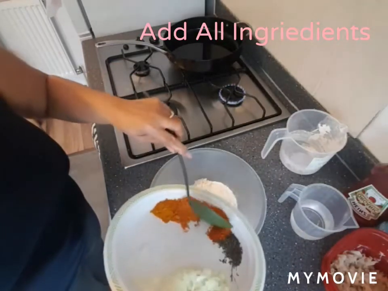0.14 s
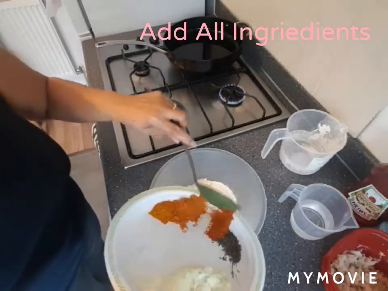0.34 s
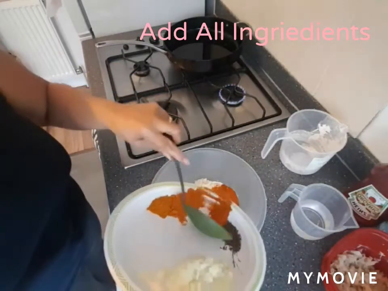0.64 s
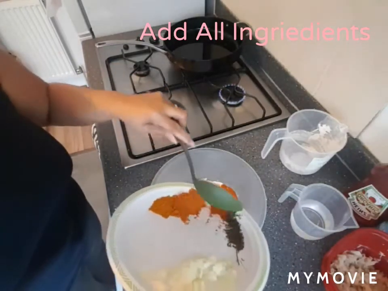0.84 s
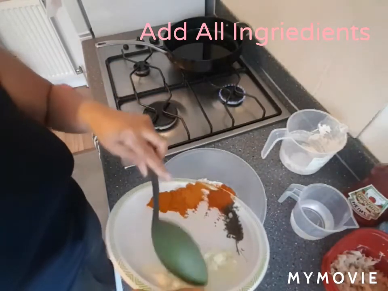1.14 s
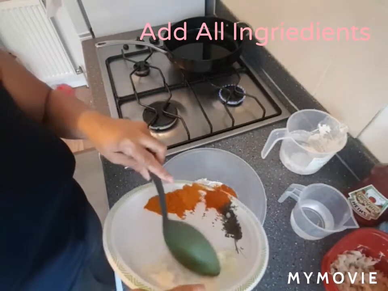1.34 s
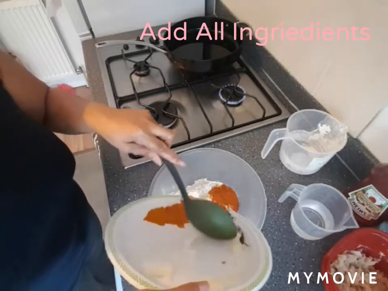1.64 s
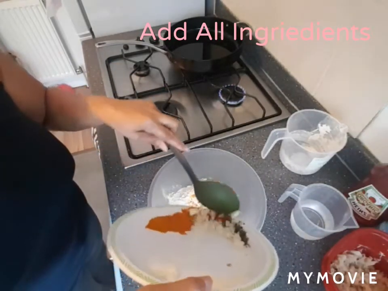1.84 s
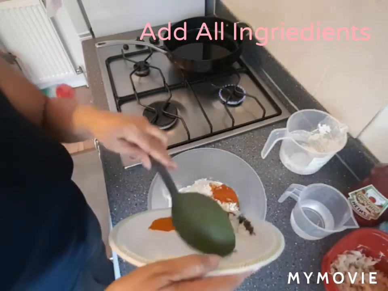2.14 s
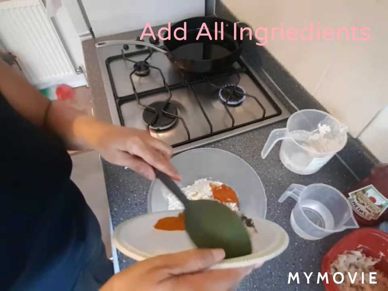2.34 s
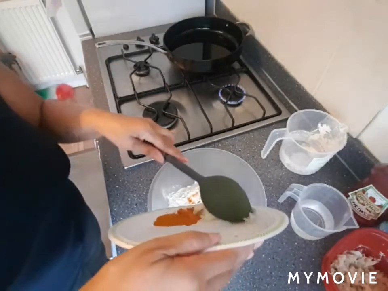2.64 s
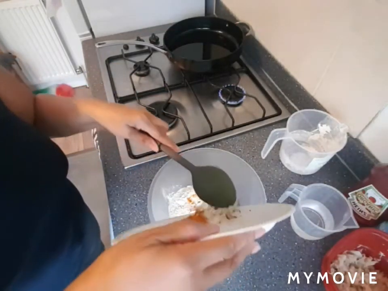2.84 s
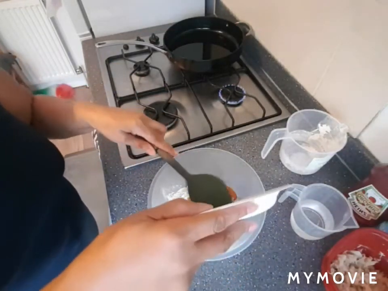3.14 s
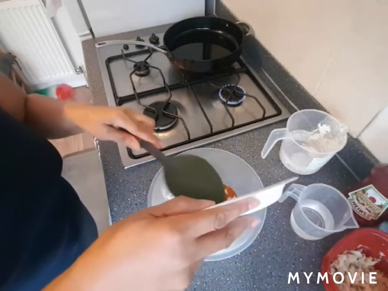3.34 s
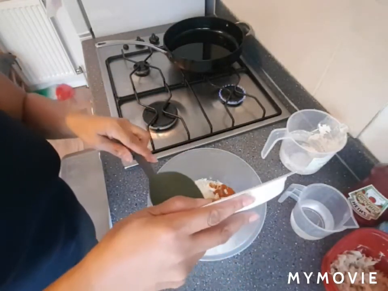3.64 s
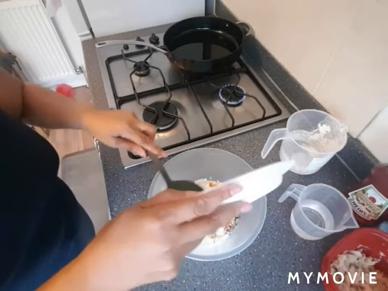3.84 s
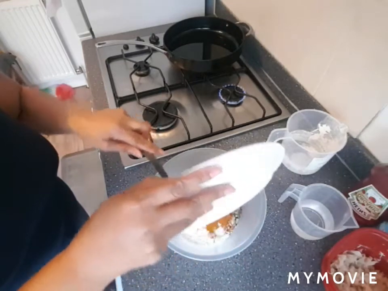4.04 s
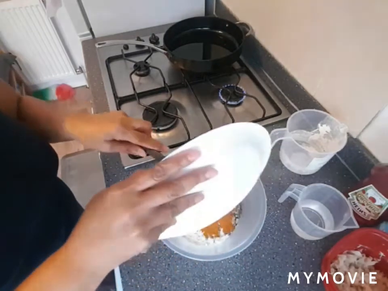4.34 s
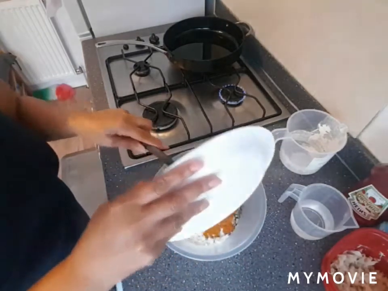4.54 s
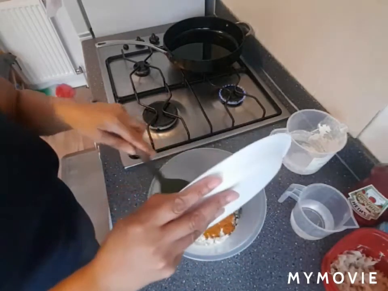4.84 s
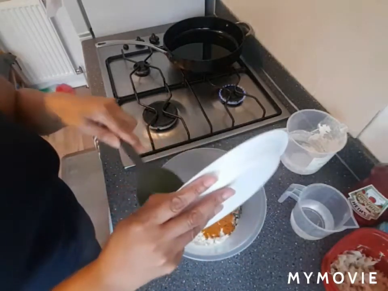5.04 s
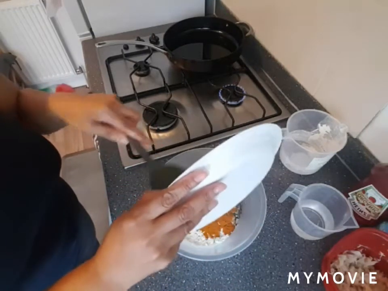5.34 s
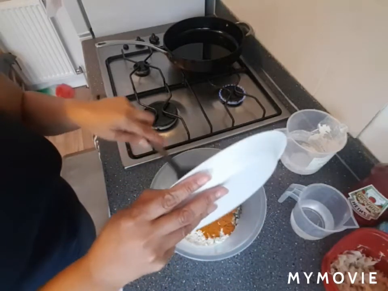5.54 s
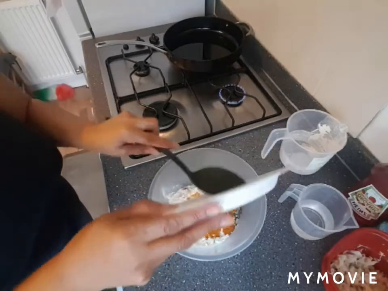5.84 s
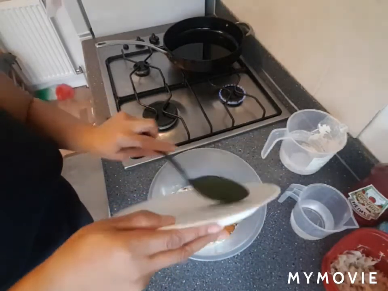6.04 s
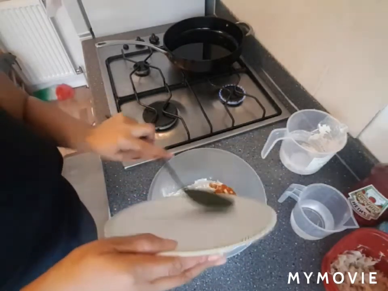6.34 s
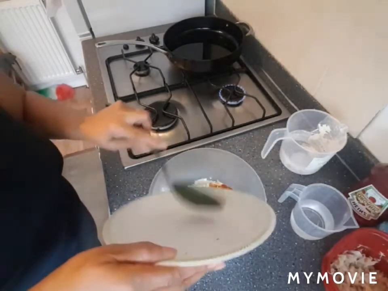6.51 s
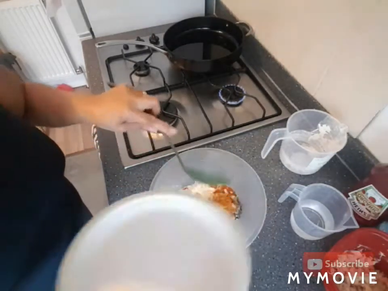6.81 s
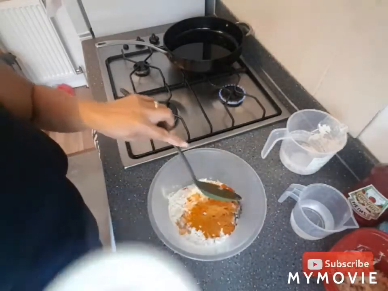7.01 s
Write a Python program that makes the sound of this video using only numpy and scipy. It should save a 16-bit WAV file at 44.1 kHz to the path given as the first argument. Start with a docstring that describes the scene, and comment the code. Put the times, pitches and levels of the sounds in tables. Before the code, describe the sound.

A plastic spatula works over a plate close to the microphone in a small kitchen with a short echo. From the start it pushes spices into a plastic mixing bowl with quick taps and short, powdery rasps, knocking the bowl at about 0.7 seconds with a firmer scrape. At 1.6 seconds the blade skips in a brief rattle. Softer, uneven scrapes and rim clicks continue, and around 3 seconds come a few light, dry ticks like dropping crumbs. From about 4.4 seconds, dull thumps jostle the bowl and boom faintly in the worktop, among more taps and scrapes. Between 6 and 6.7 seconds the last strokes knock the bowl several times and strike the plate sharply. A low, steady appliance hum and faint room hiss lie underneath throughout.

```python
"""A small kitchen, one microphone close by; an appliance hums throughout over faint room air.
From the start a plastic spatula pushes spices off a hand-held plate into a plastic mixing bowl, tapping,
rasping over the powdery glaze and often clicking off the rim. At 1.6 s the blade skips; around 3 s come
light ticks, as of crumbs dropping. From 4.4 s jostles thump the bowl and boom in the worktop, and after
6 s the last strokes knock the bowl several times."""
import sys
import numpy as np
from scipy import signal
from scipy.fft import rfft, irfft
from scipy.io import wavfile
from scipy.ndimage import uniform_filter1d

SR = 44100
rng = np.random.default_rng(int(sys.argv[2]) if len(sys.argv) > 2 else 0)


def unload_audio(sound):
    """Save the sound as a 16-bit wav file, at the path given as the first command line argument."""
    columns = np.transpose(np.atleast_2d(sound))
    # keep every value between -1 and 1, then stretch to whole-number steps
    steps = np.round(np.clip(columns, -1, 1) * 32767)
    wavfile.write(sys.argv[1], SR, steps.astype(np.int16))


N = 316225

# Event levels are relative within a table; each source adds its own gain.
# Pushes of the blade over the plate: (start [s], press [s], release [s], peak rasp [dB], swell [dB],
# grit re rasp [dB], hiss re rasp [dB], blade resonance at start [Hz], at end [Hz])
STROKES = [ (0.01, 0.077, 0.073, -48.5, 4.5, -2.5, -17, 800, 800),
           (0.07, 0.055, 0.053, -36, 16.5, -2.5, -5, 1040, 940),
           (0.138, 0.1, 0.08, -32.5, 8.3, -3.5, -9.5, 950, 740),
           (0.305, .02, 0.13, -47.5, 4.1, 1.5, -1.5, 810, 920),
           (0.358, 0.018, 0.029, -37, 20, 10, -2, 2620, 2500),
           (0.403, 0.013, 0.039, -34.5, 2.9, -7.5, -17, 820, 750),
           (0.746, 0.032, 0.13, -27, 13, -6.5, -14, 1020, 836),
           (1.01, 0.053, 0.14, -69, 3, 5.5, 0.5, 900, 850), (1.292, 0.013, 0.056, -56, 4, 6, -9, 930, 1200),
           (1.335, 0.14, 0.26, -43.5, 13, -6.5, -18, 1290, 920),
           (1.611, 0.1, 0.12, -40, 5.5, -16, -18, 714, 810),
           (1.719, 0.037, 0.34, -42, 3.4, -6, -9, 790, 760),
           (2.02, 0.017, 0.06, -70, 4, 12, -10, 1400, 1230),
           (2.308, 0.026, 0.27, -59, 3.1, 6.5, 4, 1050, 1260),
           (2.395, 0.016, 0.089, -48.5, 3, -5.5, -9, 970, 900),
           (2.47, 0.1, 0.045, -56.5, 6.8, 3.5, 0, 1600, 1100),
           (2.575, .085, 0.2, -49.5, 2, -10.5, -19, 850, 700),
           (2.705, 0.11, 0.18, -48, 15, 6, 6.5, 1810, 2080),
           (2.883, 0.031, 0.16, -53, 2, 1, -20, 2120, 2200),
           (3.14, 0.059, 0.1, -33, 13.8, -7, -11.5, 1770, 730),
           (3.539, 0.098, 0.42, -56, 9, -3, -3.5, 1150, 855),
           (3.698, 0.11, 0.16, -40.5, 16.5, -4.5, -17, 785, 1390),
           (3.824, 0.038, 0.079, -49.5, 9, 10, -1, 1840, 2460),
           (4.126, .045, 0.048, -42.5, 6.5, -1, -10, 1220, 1800),
           (4.214, 0.014, 0.058, -39.5, 4, -0.5, -4, 1070, 1100),
           (4.441, 0.032, 0.025, -39.5, 32, 1.5, -8, 990, 1670),
           (4.514, 0.0041, 0.082, -45.5, 3, 0, -17, 960, 950),
           (4.816, 0.0054, 0.12, -58.5, 2, 0.5, -7.5, 1580, 950),
           (5.149, 0.032, .12, -44, 2.2, -7.5, -12.5, 885, 870),
           (5.46, 0.031, 0.079, -41.5, 10.6, -4.5, -8.5, 855, 1090),
           (5.54, 0.017, 0.053, -49.5, 10, 12.5, 10, 1560, 2200),
           (5.818, 0.046, 0.14, -40.5, 11.8, 6, 2.5, 1110, 2440),
           (6.085, 0.066, 0.099, -40.5, 3, 0, -1.5, 1330, 1900),
           (6.235, 0.11, 0.16, -56, 1.4, 1.5, -8, 740, 730),
           (6.377, 0.053, 0.09, -33, 16, 2, 0.5, 940, 830),
           (6.64, 0.054, 0.042, -31, 11.7, 1, -2, 694, 744)]
# Spatula striking or catching on the plate; thud, crack and fizz are relative to the body band:
# (time [s], level [dB], thud [dB], crack [dB], fizz [dB])
PLATE_TAPS = [(0.001, -22, 1, -5, -10), (0.116, -12.5, -37, -15, -10), (0.153, -21.5, -27, 0, -1),
              (0.235, -15.5, -18, -9, -21), (0.266, -24, -15, -5, 2.5), (0.362, -36.5, -15, 19, 10),
              (0.761, -24.5, -27, 7.5, -34), (0.99, -30.5, -14, -18, -23.5), (1.28, -39.5, 5, -8, -23),
              (1.575, -34, 2, -8, -14), (1.74, -29.5, -23, -13, 5), (1.807, -29, -30, -16, -12),
              (1.857, -37, 4.5, 1, -1), (1.947, -34, -3, -5, -9), (2.088, -53.5, -3, 8, 3),
              (2.315, -44, 12.5, 9, 5), (2.394, -47, -3, 12, 13), (2.888, -24.5, -26, -0.5, -1),
              (3.119, -40, 7.5, -2, 1), (3.18, -23, -37, -3, -26), (3.532, -46, 7.5, 0, 3),
              (3.624, -30.5, -6.5, -12, -38), (4.115, -22, -11.5, -10, -17), (4.214, -21.5, -15, -19, -11),
              (4.421, -15, -33, -13, -30), (4.515, -20.5, -5.5, -9, -5.5), (4.936, -23.5, -24, -9, -41),
              (5.141, -23, -3.5, 0.5, -13.5), (5.229, -25, -16, -8, -50), (5.282, -40.5, -21, 4.5, 2.5),
              (5.362, -45.5, 11, -19, -23), (5.548, -24.5, -48, -17, -7), (5.791, -27, 1, -5.5, -22),
              (5.889, -28.5, -39, 11, 3), (6.436, -12.5, -10, -5, -5), (6.469, -22.5, -5, 6, -29),
              (6.7145, -14, -15, -4.5, -9)]
# Blows that reach the bowl: (time [s], level [dB], thud [dB], crack [dB], fizz [dB])
BOWL_KNOCKS = [(0.718, -19.5, -19, -19, -19), (6.067, -22.5, -10, -6.5, -14.5), (6.349, -21, -6, -5.5, -15),
               (6.367, -31, -2, -6, -6), (6.631, -20.5, -6, -8.5, -9.5)]
# First bounce of the skipping blade: (level [dB], thud [dB], crack [dB], fizz [dB])
FIRST_BOUNCE = (-17.5, -6, -21, -28.5)
# Light ticks in the bowl: (time [s], level [dB])
TICKS = [(0.572, -51), (2.9208, -29), (3.028, -41), (3.0752, -42.5), (3.3676, -38), (3.4423, -51.5)]
# Plate and bowl being jostled: (time [s], level [dB], worktop boom [dB])
THUMPS = [(4.424, -36, -44), (4.517, -34, -45.5), (4.528, -45, -58), (5.23, -46.5, -55), (5.462, -42, -59),
          (5.55, -37, -67), (6.155, -35, -63), (6.243, -40.5, -65), (6.439, -30.5, -63),
          (6.715, -35.5, -42)]
# Resonances of plate with spatula, and of the bowl: (frequency [Hz], width [Hz], lift [dB, sign ignored])
PLATE_MODES = [(450, 14, 6), (573, 29, 9), (687, 210, 5.5), (845, 78, 6.5), (1121, 17, 7), (1355, 170, 1),
               (1486, 24, 8), (1715, 49, -3), (2305, 79, 3), (2775, 18, 7), (3050, 330, 4), (4200, 250, 4),
               (4660, 100, 4), (8050, 1070, 7)]
BOWL_MODES = [(363, 55, 17), (418, 20, 14.5), (630, 45, 13), (890, 51, 9), (1570, 46, 6.5), (3050, 330, 7)]
# The four parts of a scrape, low to high: (frequency [Hz], level [dB])
DRAG_COLOUR = [(40, -11), (110, -10), (160, -14.5), (230, -9.5), (330, -3), (400, -6.5), (490, -11.5),
               (900, -7.5), (3000, -45)]
RASP_COLOUR = [(40, -42), (150, -9), (260, -21), (380, -7), (490, -13.5), (650, -4), (950, -7), (1400, -6),
               (1900, -4), (2600, -11), (5000, -67.5)]
GRIT_COLOUR = [(900, -15.5), (1600, -3), (2100, 1.5), (3200, 0), (3700, -4), (5500, -7.5), (7000, -12.5),
               (12000, -59.5)]
HISS_COLOUR = [(3000, -60), (5000, -3.5), (6300, 1), (8200, -3), (9100, -7), (10500, -4), (12500, -1),
               (16000, -9)]
# A blow, a tick, a thump and the worktop's boom at the microphone: (frequency [Hz], level [dB])
BLOW_COLOUR = [(20, -28), (50, -8.5), (150, -1), (400, -2), (1500, -2), (2200, -2), (8300, -8.5),
               (9200, -13), (16000, -11)]
TICK_COLOUR = [(300, -32), (1000, -17), (1700, -11), (2100, -2), (2400, -7), (2900, -13), (3800, -19.5),
               (5000, -25), (8000, -20), (16000, -42)]
THUMP_COLOUR = [(20, -28), (70, -8.5), (110, 4.5), (165, -4.5), (215, 2.5), (270, -8.5), (340, -4),
                (500, -5.5), (1500, -84), (5000, -92)]
BOOM_COLOUR = [(20, -18), (38, -21), (50, -12), (68, 3), (110, -36), (300, -59), (2000, -90)]
# Thud, body, crack and fizz bands of a blow: (centre [Hz]), then (width [Hz])
BAND_HZ = [250, 1000, 3400, 9500]
BAND_WIDTH_HZ = [380, 1500, 4000, 10000]
# Reverberation of the kitchen: (frequency [Hz], time to fall 60 dB [s])
KITCHEN_T60 = [(200, 0.34), (530, 0.28), (1400, 0.26), (3500, 0.32), (9700, 0.27), (16000, 0.2)]
# Still air of the room: (frequency [Hz], level [dB])
AIR_COLOUR = [(20, 1), (36, -35), (50, 16), (66, -13), (85, 6.5), (125, 2), (200, -4), (400, -3),
              (800, -12), (1600, -16), (3200, -20.5), (5000, -27.5), (10000, -33), (16000, -26.5)]

RESPONSE_SAMPLES = 8192
FREQS = np.fft.rfftfreq(RESPONSE_SAMPLES, 1 / SR)


def scrapes(judder_db=1.0, touch_s=0.0033, pile_up_s=0.0047, blade_width_hz=240, squeak_db_per_octave=5):
    """The blade judders over the powder: coarse slips sound plate and blade, finer ones grit and hiss."""
    judder = evened(amp(judder_db * wander(rate_hz=100)))
    coarse = slips(per_s=760, spread_db=2, smooth=0.45) * judder
    gritty = slips(per_s=2000, spread_db=6.5, smooth=0.78) * judder
    fine = slips(per_s=3800, spread_db=6, smooth=0.96) * judder
    colours = (DRAG_COLOUR, RASP_COLOUR, GRIT_COLOUR, HISS_COLOUR)
    bodies = [unit_energy(ring(curve(colour, FREQS) + lift(PLATE_MODES))) for colour in colours]
    out = np.zeros(N)
    for start, press_s, release_s, peak_db, swell_db, grit, hiss, start_hz, end_hz in STROKES:
        length_s = press_s + release_s
        t = np.arange(0, length_s, 1 / SR)
        span = (round(start * SR) + np.arange(len(t))) % N
        contact = np.minimum(np.minimum(t, length_s - t) / touch_s, 1)
        arch_db = pressure(t, press_s, release_s, swell_db)
        stroke_db = peak_db + arch_db
        drag_db = 0.46 * stroke_db - 36  # grows more slowly with pressure than the rasp
        rasp_db = stroke_db - 4
        grit_db = peak_db + grit - 2 + 0.98 * arch_db
        hiss_db = peak_db + hiss - 1.5 + 0.99 * arch_db
        hiss_db -= 6 * np.exp(-t / pile_up_s)  # powder takes a moment to pile up before the blade
        parts = zip((gritty, coarse, gritty, fine), (drag_db, rasp_db, grit_db, hiss_db), bodies)
        rub = sum(signal.fftconvolve(drive[span] * contact * amp(db), body) for drive, db, body in parts)
        # the blade's resonance glides as the contact slides along it; a rising push rings it harder
        blade_hz = start_hz + (end_hz - start_hz) * t / length_s
        squeak_db = squeak_db_per_octave * max(np.log2(end_hz / start_hz), 0)
        grit_share = np.clip((blade_hz - 1500) / 1200, 0, 1)  # when high, the grit feeds it
        force = coarse[span] * contact * amp(stroke_db - 8 + squeak_db + grit * grit_share)
        overtone = amp(-8) * resonate(force, 2.3 * blade_hz, 2 * blade_width_hz)
        add(rub, 0, resonate(force, blade_hz, blade_width_hz) + overtone)
        paths = [scatter(near_t60=0.022, near_db=-3, chatter_db=-11) for _ in range(4)]
        add(out, start, shifting(rub, paths, per_s=6.72))
    return out


def pressure(t, press_s, release_s, swell_db, fade_db=32.5):
    """The hand leans in, then lets go: one arch in dB with its top at 0."""
    to_go = np.clip(1 - t / press_s, 0, 1)
    gone = np.clip((t - press_s) / release_s, 0, 1)
    return -swell_db * to_go ** 0.73 - fade_db * gone ** 1.33


def slips(per_s, spread_db, smooth):
    """Friction: tiny slips of uneven size over a smooth rub."""
    size = amp(spread_db * np.minimum(rng.exponential(1, N), 3.5)) * rng.choice([-1, 1], N)
    slipping = rng.random(N) < per_s / SR
    return evened(evened(size * slipping) + smooth * rng.standard_normal(N))


def blows(rows, modes, gain_db, near_t60, near_db, thud_db=0, crack_db=0, fizz_db=0, chatter_t60=0.033):
    """Each blow of the spatula is one short push, heavy or sharp, that rings plate or bowl."""
    out = np.zeros(N)
    body_db = lift(modes) + curve(BLOW_COLOUR, FREQS)
    for time_s, db, thud, crack, fizz in rows:
        bands_db = db + np.array([thud + thud_db, 0, crack + crack_db, fizz + fizz_db])
        density_db = bands_db - 10 * np.log10(np.array(BAND_WIDTH_HZ) / SR)
        push_db = curve(np.transpose([BAND_HZ, density_db]), FREQS) + gain_db
        path = scatter(near_t60, near_db, chatter_t60, chatter_db=7)
        add(out, time_s, signal.fftconvolve(ring(push_db + body_db), path))
    return out


def skid(start_s=1.601, first_gap_s=0.026, shrink=0.9, loss_db=2, count=5):
    """The blade skips, each bounce sooner and weaker; pressed down, it damps the plate."""
    db, *colour = FIRST_BOUNCE
    gaps = first_gap_s * shrink ** np.arange(count)
    bounces = [(start_s + gaps[:k].sum(), db - k * loss_db, *colour) for k in range(count)]
    return blows(bounces, PLATE_MODES, gain_db=12.5, near_t60=0.056, near_db=4,
                 thud_db=-4, crack_db=2, fizz_db=4, chatter_t60=0.013)


def ticks(gain_db=13):
    """Light, dry, pitched ticks, as of crumbs dropping into the bowl."""
    times, db = np.transpose(TICKS)
    return impacts(times, db + gain_db, TICK_COLOUR, near_t60=0.047)


def thumps(bowl_gain_db=24, boom_gain_db=32):
    """A jostle thumps the bowl and booms in the worktop below."""
    times, bowl_db, boom_db = np.transpose(THUMPS)
    bowl = impacts(times, bowl_db + bowl_gain_db, THUMP_COLOUR, near_t60=0.1)
    worktop = impacts(times, boom_db + boom_gain_db, BOOM_COLOUR, near_t60=0.1)
    return bowl + worktop


def impacts(times, levels_db, colour, near_t60, pitch_spread=0.033):
    """Small impacts of one colour, each pitched a little differently."""
    out = np.zeros(N)
    for time_s, db in zip(times, levels_db):
        detune = np.exp(pitch_spread * rng.uniform(-1, 1))
        body = unit_energy(ring(curve(colour, FREQS * detune)))
        add(out, time_s, amp(db) * signal.fftconvolve(body, scatter(near_t60, near_db=4.5)))
    return out


def scatter(near_t60, near_db, chatter_t60=0.017, chatter_db=0):
    """To the microphone: direct sound, contact chatter, quick echoes off bowl, worktop and tiles."""
    t = np.arange(RESPONSE_SAMPLES // 2) / SR
    chatter, near = rng.standard_normal((2, len(t))) * (t > 0.0003)
    path = amp(chatter_db) * unit_energy(chatter * amp(-60 * t / chatter_t60))
    path += amp(near_db) * unit_energy(near * amp(-60 * t / near_t60))
    path[0] = 1
    # the paths spread a click in time and ripple its spectrum, but keep its broad colour
    power = uniform_filter1d(abs(rfft(path, RESPONSE_SAMPLES)) ** 2, size=181)
    return signal.fftconvolve(path, ring(-10 * np.log10(power + 1e-6)))[:len(t)]


def shifting(x, paths, per_s):
    """Things move, so the sound fades in turn from one echo path to the next."""
    turn = per_s * np.arange(len(x)) / SR
    shares = [np.maximum(np.cos(2 * np.pi * (turn - k / len(paths))), 0) for k in range(len(paths))]
    total = np.sqrt(np.sum(np.square(shares), 0))
    return sum(signal.fftconvolve(x * share / total, path) for share, path in zip(shares, paths))


def kitchen(x, wet_db=-9, build_s=0.0028):
    """Hard walls close around: a short tail builds up, then dies at its own speed in each band."""
    echoes = rng.standard_normal((4, SR // 2)) * (rng.random((4, SR // 2)) < 0.1)
    hz, t, spectra = signal.stft(echoes, SR, nperseg=256)
    decay = amp(-60 * t / curve(KITCHEN_T60, hz)[:, None])
    tails = signal.istft(spectra * decay, SR, nperseg=256)[1]
    tails *= 1 - np.exp(-(np.arange(tails.shape[1]) / SR / build_s) ** 2)
    return x + amp(wet_db) * shifting(x, [unit_energy(tail) for tail in tails], per_s=5)[:N]


def hum(hz=100.15, level_db=-52.5, waver_db=0.46):
    """In the background an appliance hums at twice the mains frequency and wavers slightly."""
    turns = hz * np.arange(N) / SR + 0.014 * wander(rate_hz=5.5)
    return amp(level_db - waver_db * wander(rate_hz=2.1)) * np.sqrt(2) * np.sin(2 * np.pi * turns)


def air(level_db=-59, swell_db=3, rumble_hz=120):
    """Room tone: a steady faint hiss; only its low rumble swells."""
    hz = np.fft.rfftfreq(N, 1 / SR)
    noise = evened(irfft(rfft(rng.standard_normal(N)) * amp(curve(AIR_COLOUR, hz)), N))
    rumble = irfft(rfft(noise) / (1 + (hz / rumble_hz) ** 4), N)
    return amp(level_db) * (noise - rumble + rumble * amp(swell_db * wander(rate_hz=1.1)))


def resonate(x, hz, width_hz):
    """A resonance that follows the curve hz and keeps the power of a white drive."""
    turn = np.exp(2j * np.pi * np.cumsum(hz) / SR)
    pole = np.exp(-np.pi * width_hz / SR)
    return (turn * signal.lfilter([np.sqrt(2 * (1 - pole ** 2))], [1, -pole], x / turn)).real


def lift(modes):
    """The dB curve of a set of resonances."""
    peaks = ((amp(db) ** 2 - 1) / (1 + (2 * (FREQS - hz) / width) ** 2) for hz, width, db in np.abs(modes))
    return 10 * np.log10(1 + sum(peaks))


def ring(db):
    """Causal response to a click for a dB curve: sharp start, then ringing."""
    cepstrum = irfft(np.log(amp(db)))
    cepstrum[1:RESPONSE_SAMPLES // 2] *= 2
    cepstrum[RESPONSE_SAMPLES // 2 + 1:] = 0
    return irfft(np.exp(rfft(cepstrum)))


def wander(rate_hz):
    """Smooth random drift of rms 1, mostly slower than the given rate."""
    hz = np.fft.rfftfreq(N, 1 / SR)
    return evened(irfft(rfft(rng.standard_normal(N)) / (1 + (hz / rate_hz) ** 2) ** 2, N))


def curve(points, hz):
    """Reads (frequency, value) points on a log-frequency axis."""
    point_hz, value = np.transpose(points)
    return np.interp(np.log(hz + 1), np.log(point_hz + 1), value)


def add(mix, time_s, sound):
    """Mixes a sound in at the given time."""
    part = mix[max(round(time_s * SR), 0):][:len(sound)]
    part += sound[:len(part)]


def amp(db):
    """Decibels to gain."""
    return 10 ** (np.asarray(db) / 20)


def evened(x):
    """Scales to rms 1."""
    return x / np.sqrt(np.mean(x ** 2) + 1e-20)


def unit_energy(x):
    """Scales to energy 1."""
    return x / np.linalg.norm(x)


def scene():
    """Spatula, plate and bowl close to the microphone, the kitchen around them, hum and air behind."""
    taps = blows(PLATE_TAPS, PLATE_MODES, gain_db=11, near_t60=0.1, near_db=5.5, fizz_db=2)
    knocks = blows(BOWL_KNOCKS, BOWL_MODES, gain_db=14, near_t60=0.055, near_db=11.5,
                   crack_db=4, fizz_db=5)
    foreground = taps + knocks + skid() + scrapes() + ticks() + thumps()
    return (kitchen(foreground) + hum() + air())[None]


def record(dry):
    """The microphone's mono channel is cut off above 15.9 kHz."""
    lowpass = signal.firwin(511, 15900, window=("kaiser", 9), fs=SR)
    return signal.oaconvolve(dry, lowpass[None], "same")


dry = scene()
out = record(dry)
unload_audio(out)
```